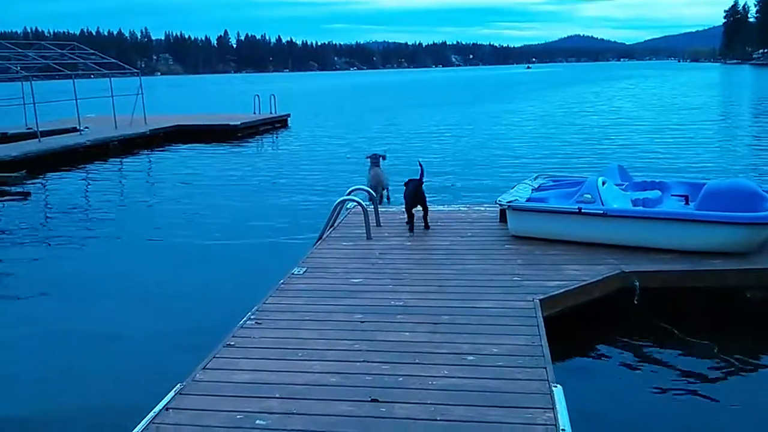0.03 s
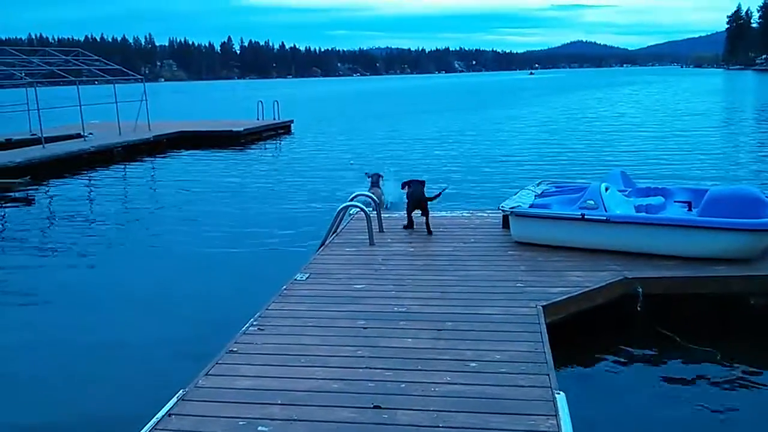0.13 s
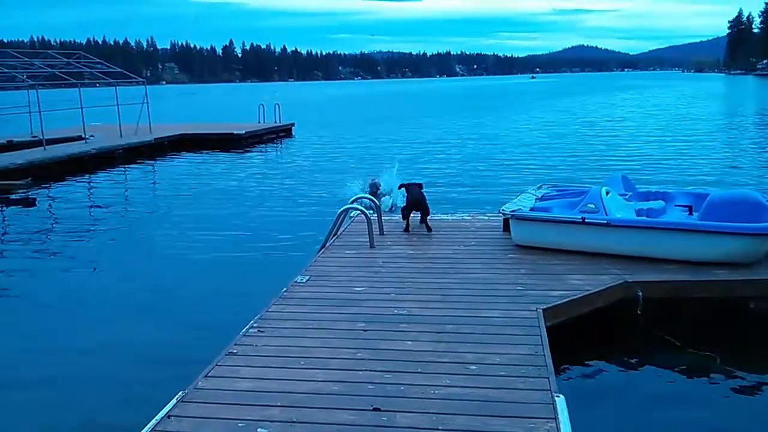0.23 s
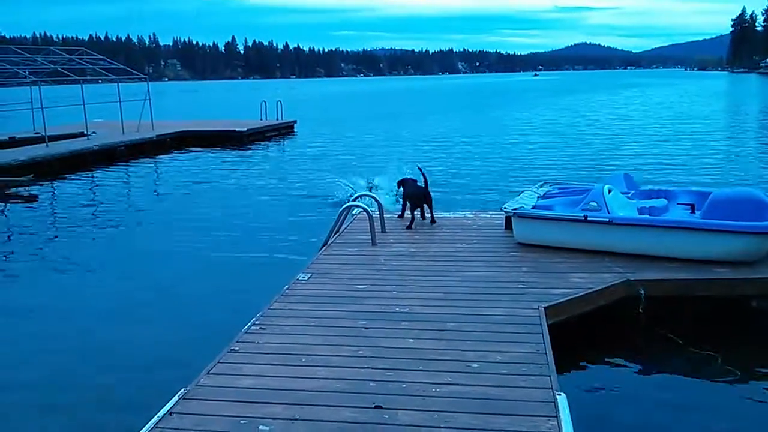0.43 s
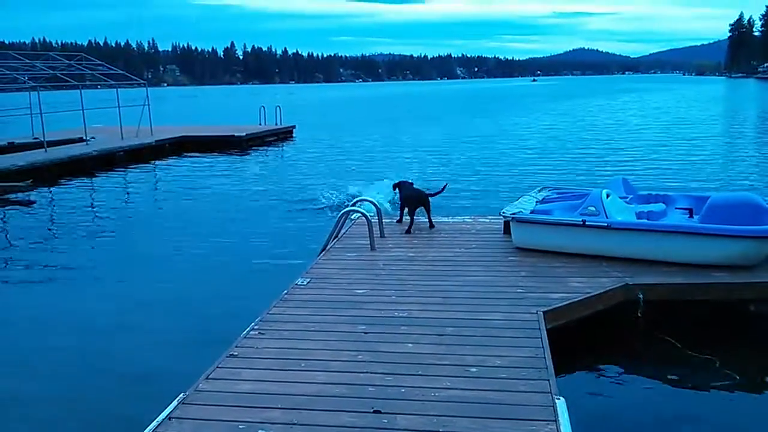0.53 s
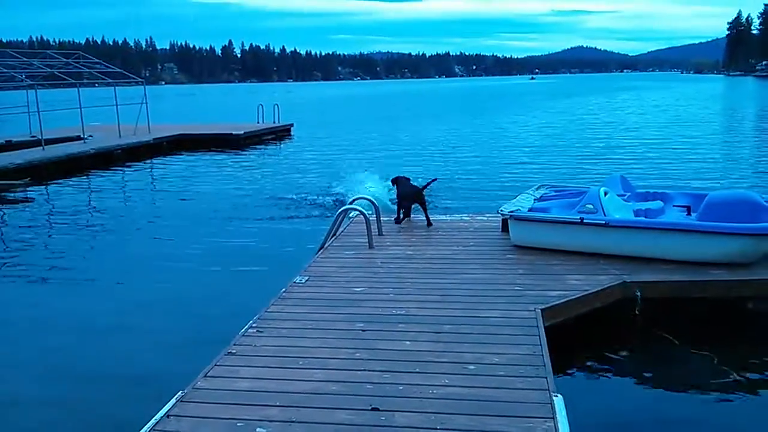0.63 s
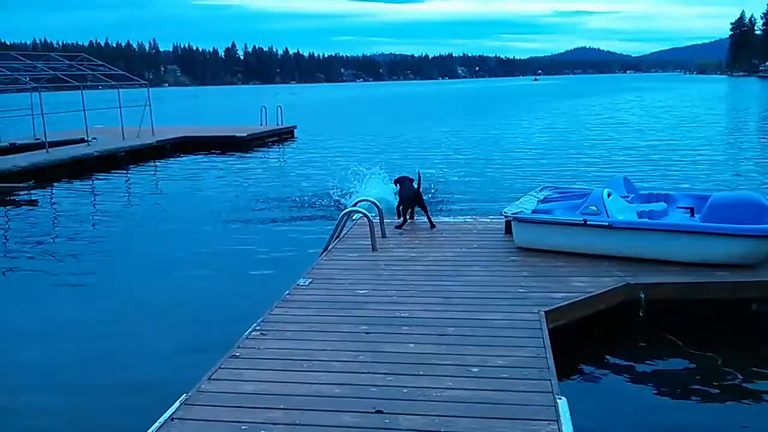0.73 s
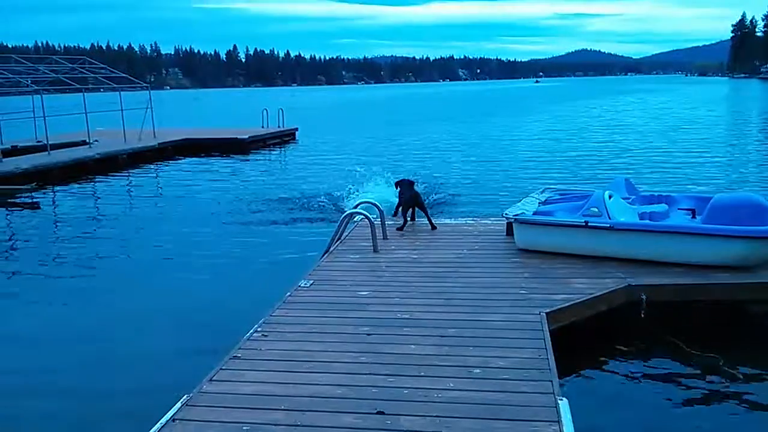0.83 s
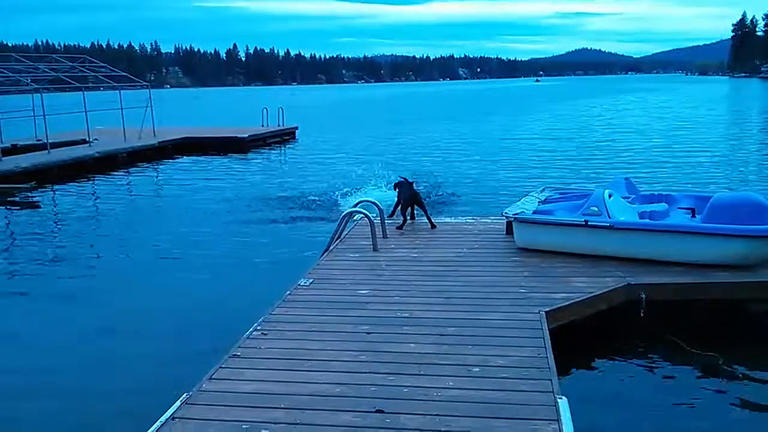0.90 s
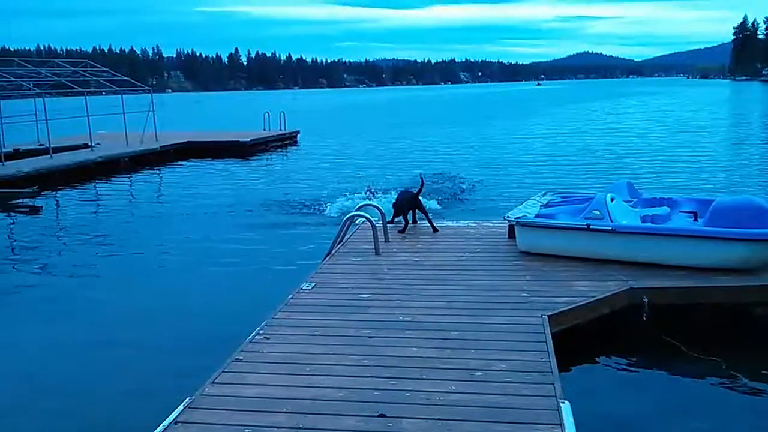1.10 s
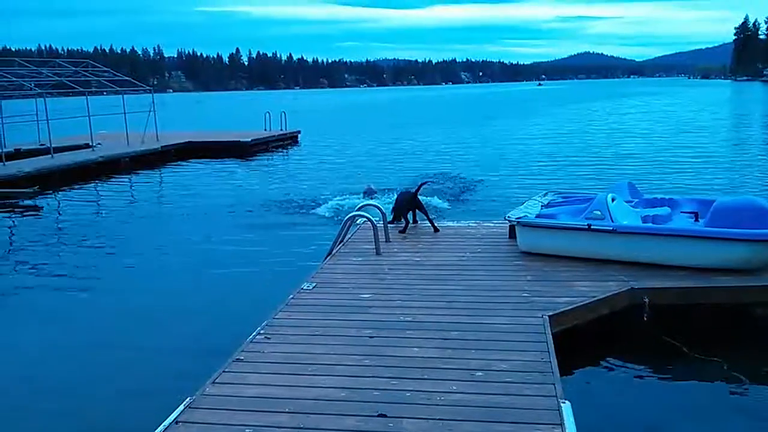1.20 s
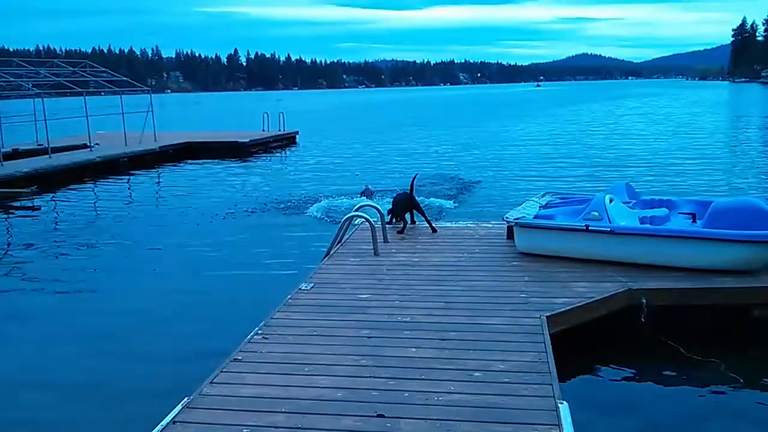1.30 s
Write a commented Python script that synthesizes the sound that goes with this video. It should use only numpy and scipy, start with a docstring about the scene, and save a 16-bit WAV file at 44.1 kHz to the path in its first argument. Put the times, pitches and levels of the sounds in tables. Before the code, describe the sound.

A dog splashes into a lake at about 0.2 seconds with a slap and a deep, hollow plunk. A smaller splash follows at 0.6 seconds, then muffled churning, plops and pattering drops ease off toward 1.3 seconds. A second dog's paws thump unevenly on a wooden dock, loudest at about 0.9 seconds. Faint low wind and hiss lie underneath.

```python
"""At a wooden dock on a lake, a dog leaps in while a second dog steps about on the boards.
Its body slaps the water and traps pockets of air that boom. The water plops and churns,
and spray patters back down. Slaps and churning sound muffled and hollow because they ring
a small camera housing. Low wind and a faint hiss lie underneath."""
import sys
import numpy as np
from scipy import signal
from scipy.fft import rfft, irfft
from scipy.io import wavfile
from scipy.ndimage import uniform_filter1d

SR = 44100
rng = np.random.default_rng(int(sys.argv[2]) if len(sys.argv) > 2 else 0)


def bounce(signal):
    """Save signal as a 16-bit WAV file at the path given by the first command-line argument."""
    frames = np.transpose(np.atleast_2d(signal))
    limited = np.clip(frames, -1, 1)
    pcm = np.round(limited * 32767).astype(np.int16)
    wavfile.write(sys.argv[1], SR, pcm)


N = 59535  # 1.35 s

# air trapped under the dog: t/s, level/dB, f/Hz, ring time/s, pitch rise/(share of f per s)
AIR_POCKETS = [(0.2328, -15, 173.5, 0.079, 0.35), (0.267, -22.5, 178, 0.076, 0.5),
               (0.2986, -22, 189, 0.056, 0.5), (0.331, -28.5, 180, 0.06, 0.3),
               (0.379, -30.5, 172, 0.059, 0.3), (0.497, -37, 176, 0.11, 0.25),
               (0.6035, -28, 224, 0.034, 0.2), (0.613, -27, 159.4, 0.094, 0.23),
               (0.699, -42.5, 125, 0.11, 3.2), (0.7177, -36, 160.2, 0.18, 2.9),
               (0.981, -37.5, 278.4, 0.087, 0.57), (1.009, -42, 284, 0.078, 1.5)]
# sharp smacks on the water: t/s, level/dB
BODY_SMACKS = [(0.1797, -48), (0.225, -22.5), (0.2347, -30)]
# the tones in each smack: f/Hz, level/dB, ring time/s
SMACK_TONES = [(1485, -12, 0.017), (1740, -7.5, 0.0052), (2194, -21.5, 0.004)]
def plunge():
    """The body smacks the surface, and the air it traps booms with a rising pitch."""
    booms = sum(undb(db) * ring(start, hz, ring_s, rise_s=0.0031, glide=glide)
                for start, db, hz, ring_s, glide in AIR_POCKETS)
    smacks = sum(undb(db + tone_db) * ring(start, hz, ring_s, rise_s=0.00097)
                 for start, db in BODY_SMACKS for hz, tone_db, ring_s in SMACK_TONES)
    return booms + smacks


# heavy slaps of water: t/s, level/dB, fade time/s
WATER_SLAPS = [(0.178, -43.5, 0.01), (0.231, -43, 0.033), (0.6055, -36.5, 0.0084), (0.787, -50, 0.007)]
def slaps():
    """Each slap of water is a burst of noise that rings the housing."""
    hollow_noise = steady(housing(rng.standard_normal(N)), span_s=0.0071)
    return bursts(WATER_SLAPS) * hollow_noise


# gulps of water: t/s, level/dB, f/Hz, ring time/s, rise time/s
GULPS = [(0.051, -52.5, 594, 0.044, 0.0026), (0.117, -53.5, 904, 0.031, 0.0044),
         (0.1795, -40.5, 640, 0.024, 0.0048), (0.208, -39, 606, 0.017, 0.0042),
         (0.236, -31, 508, 0.033, 0.0023), (0.4195, -39.5, 656, 0.09, 0.0015),
         (0.438, -40, 616, 0.036, 0.0064), (0.7225, -38.5, 636, 0.096, 0.006),
         (0.792, -39, 665.5, 0.094, 0.0056), (0.9587, -36, 673, 0.069, 0.0024),
         (1.038, -42, 681, 0.19, 0.0059), (1.225, -48, 680, 0.078, 0.0048)]
# the tones in each gulp: multiple of f, level/dB, share of the ring time
GULP_TONES = [(0.998, 2, 0.71), (1.4, -18, .9)]
def plops():
    """Single gulps of water each give a short, hollow ring."""
    return sum(undb(db + tone_db) * ring(start, hz * multiple, ring_s * share, rise_s)
               for start, db, hz, ring_s, rise_s in GULPS for multiple, tone_db, share in GULP_TONES)


# loudness of the low wash around the dog: t/s, level/dB
WASH_LOUDNESS = [(0, -50), (.16, -61.5), (.22, -64.5), (.25, -40.5), (.36, -38), (.47, -43.5), (.55, -46),
                 (.615, -39.5), (.68, -48), (.85, -55.5), (1.0, -50), (1.14, -63), (1.35, -61)]
# its tone, from bass to treble: f/Hz, level/dB
WASH_TONE = [(40, -20), (90, -11.5), (170, 2), (240, -2.5), (315, 1), (380, -18), (700, -19.5),
             (2000, -62.5)]
# loudness of the churning: t/s, level/dB
CHURN_LOUDNESS = [(0, -58.5), (.05, -71), (.115, -58), (.165, -74), (.22, -45), (.25, -47.5), (.31, -43.5),
                  (.39, -54.5), (.48, -52), (.55, -52), (.62, -40.5), (.70, -53.5), (.81, -48.5),
                  (.89, -58), (1.02, -47), (1.15, -57), (1.35, -58.5)]
def stirred_water():
    """Many tiny splashes blur into a low wash and a churning that rings the housing."""
    wash = steady(colour(patter(scatter_db=1.5), WASH_TONE), span_s=0.025)
    churn = steady(housing(patter(scatter_db=1.5)), span_s=0.02)
    return swell(WASH_LOUDNESS) * wash + swell(CHURN_LOUDNESS) * churn


# steps on the dock: t/s, thump level/dB, knock level/dB
PAW_STEPS = [(0.196, -41.5, -58), (0.246, -57, -52), (0.417, -38, -41.5), (0.612, -39, -32.5),
             (0.649, -43, -50), (0.8941, -25, -25.5), (1.18, -46, -60), (1.246, -40, -53)]
# deep tones of the whole dock: f/Hz, level/dB, ring time/s, rise time/s
DOCK_TONES = [(69, -2.5, 0.1, 0.012), (124, -10, 0.037, 0.012)]
# tones of one plank: f/Hz, level/dB, ring time/s, rise time/s
PLANK_TONES = [(158, 3.5, 0.018, 0.0038), (280, -9.5, 0.017, 0.0032)]
def paws():
    """A paw knocks on one plank, and the whole dock answers with a slower thump."""
    thumps = sum(undb(db + tone_db) * ring(start, hz, ring_s, rise_s)
                 for start, db, _ in PAW_STEPS for hz, tone_db, ring_s, rise_s in DOCK_TONES)
    knocks = sum(undb(db + tone_db) * ring(start, hz, ring_s, rise_s)
                 for start, _, db in PAW_STEPS for hz, tone_db, ring_s, rise_s in PLANK_TONES)
    return thumps + knocks


# loudness of the shower of small drops: t/s, level/dB
SHOWER_LOUDNESS = [(0, -71.5), (.06, -78.5), (.11, -78), (.17, -85), (.185, -64.5), (.27, -53.5),
                   (.36, -64), (.46, -65), (.59, -62), (.62, -52), (.70, -59), (.795, -53.5), (.88, -59.5),
                   (1.02, -57.5), (1.35, -59)]
# its tone: f/Hz, level/dB
SHOWER_TONE = [(500, -30.5), (950, 12), (1150, -10), (1400, 4.5), (1620, -6.5), (1850, 3.5), (2100, -2),
               (2330, -14.5), (2500, -10), (3000, -18.5), (6000, -36.5)]
# single big drops: t/s, level/dB, f/Hz, ring time/s
BIG_DROPS = [(0.103, -62.5, 1680, 0.04), (0.559, -51.5, 1810, 0.038), (0.640, -50, 1820, 0.028),
             (0.664, -52.5, 1920, 0.023), (0.689, -58, 4300, 0.03), (0.769, -64, 4450, 0.017),
             (0.795, -60.5, 4400, 0.025)]
def drops():
    """Small drops patter on the lake; each big one traps a bubble that plinks upward in pitch."""
    shower = steady(colour(patter(scatter_db=2), SHOWER_TONE), span_s=0.072)
    plinks = sum(undb(db) * ring(start, hz, ring_s, rise_s=0.0016, glide=0.79)
                 for start, db, hz, ring_s in BIG_DROPS)
    return swell(SHOWER_LOUDNESS) * shower + plinks


# loudness of the fine spray: t/s, level/dB
SPRAY_LOUDNESS = [(0, -95), (.11, -80), (.174, -89), (.183, -68), (.205, -75), (.28, -64.5), (.35, -79),
                  (.45, -81), (.58, -75), (.62, -70), (.67, -76), (.73, -70), (.80, -69.5), (.88, -75.5),
                  (1.35, -74.5)]
# clumps of spray hitting the lake: t/s, level/dB, fade time/s
SPRAY_CLUMPS = [(0.1795, -64, 0.006), (0.688, -63.5, 0.013), (0.719, -62, 0.006), (0.755, -72, .008)]
# tone of the spray and its clumps: f/Hz, level/dB
SPRAY_TONE = [(1200, -30.5), (2500, 0.5), (3100, -4.5), (3900, 3.5), (4700, -2), (5500, -5), (6400, -35),
              (15000, -48)]
# loudness of the thin fizz on top of the splash: t/s, level/dB
FIZZ_LOUDNESS = [(0, -99), (.176, -87), (.183, -68.5), (.205, -76), (.25, -69), (.31, -70), (.40, -83),
                 (.88, -77), (.96, -73), (1.15, -81), (1.35, -79.5)]
# its tone: f/Hz, level/dB
FIZZ_TONE = [(3000, 0), (6500, -7), (8000, -0.5), (15000, -2)]
def spray():
    """Spray lands as a fine patter, a few bright splats and a thin fizz."""
    droplets = steady(colour(patter(scatter_db=2.5), SPRAY_TONE), span_s=0.086)
    splats = bursts(SPRAY_CLUMPS) * noise(SPRAY_TONE)
    fizz = swell(FIZZ_LOUDNESS) * noise(FIZZ_TONE)
    return swell(SPRAY_LOUDNESS) * droplets + splats + fizz


# pitches at which the housing rings: f/Hz, width of one filter/Hz, level/dB
HOUSING_TONES = [(308, 64, -3.5), (494.6, 55, -1.5), (646, 104.4, 7), (904.2, 92, 2.5), (1345, 41, -18.5),
                 (1710, 240, -18)]
def housing(x):
    """The hollow housing rings at a few pitches and muffles everything between them."""
    out = 0
    for hz, width, db in HOUSING_TONES:
        b, a = signal.iirpeak(hz, hz / width, fs=SR)
        once = signal.lfilter(b, a, x)
        out = out + undb(db) * signal.lfilter(b, a, once)  # filtering twice sharpens the peak
    return unit(out)


# tones of the wind and the hiss: f/Hz, level/dB
WIND_TONE = [(15, -3.5), (35, -25), (75, 4.5), (130, -3), (300, -22.5), (1000, -44), (4000, -70.5)]
HISS_TONE = [(500, -25), (2500, -13.5), (5000, 1.5), (6400, -3.5), (8000, 2), (15000, 2.5)]
def wind_and_hiss():
    """Wind rumbles low under a faint, steady hiss."""
    return undb(-58.5) * noise(WIND_TONE) + undb(-76) * noise(HISS_TONE)


def ring(start, hz, ring_s, rise_s, glide=0):
    """A tone that swells for rise_s, then fades by 60 dB in ring_s; glide bends it upward."""
    t = since(start)
    onset = np.sin(np.pi / 2 * np.minimum(t / rise_s, 1)) ** 2
    fade = np.exp(-np.log(1000) * np.maximum(t - rise_s, 0) / ring_s)
    return onset * fade * np.sin(2 * np.pi * hz * t * (1 + glide * t / 2))


def bursts(rows, rise_s=0.0011):
    """The loudness of short splashes: each jumps up, then dies away."""
    return sum(undb(db) * (1 - np.exp(-since(start) / rise_s)) * np.exp(-since(start) / fade_s)
               for start, db, fade_s in rows)


def patter(scatter_db, hits_per_s=2500):
    """Tiny clicks at random moments; more scatter makes their sizes less even."""
    hits = rng.random(N) < hits_per_s / SR
    direction = np.sign(rng.standard_normal(N))
    return hits * direction * undb(scatter_db * rng.exponential(size=N))


def noise(tone):
    """A smooth rush of noise with the given tone."""
    return colour(rng.standard_normal(N), tone)


def colour(x, tone):
    """Shape a sound's bass and treble along (f/Hz, level/dB) points."""
    hz, db = np.array(tone).T
    f = np.maximum(np.fft.rfftfreq(N, 1 / SR), 1)
    gain = undb(np.interp(np.log(f), np.log(hz), db))
    # build the filter so that each click rings after it lands, not before
    cepstrum = irfft(np.log(gain), N)
    response = np.exp(2 * rfft(cepstrum[:N // 2], N))
    return unit(irfft(rfft(x) * response, N))


def steady(x, span_s):
    """Even out swells slower than span_s, keeping the fine crackle."""
    power = uniform_filter1d(x ** 2, max(int(span_s * SR), 2))
    return x / np.sqrt(power + 1e-9)


def swell(curve):
    """Loudness that follows (t/s, level/dB) points."""
    return undb(np.interp(np.arange(N) / SR, *np.array(curve).T))


def since(start):
    """Seconds since a moment, zero before it."""
    return np.maximum(np.arange(N) / SR - start, 0)


def undb(db):
    """Turn decibels into a number to multiply by."""
    return 10 ** (np.asarray(db) / 20)


def unit(x):
    """Scale a sound to an average power of 1."""
    return x / np.sqrt(np.mean(x ** 2))


def scene():
    """The splash, the paws and the background together in one channel."""
    splash = plunge() + slaps() + plops() + stirred_water() + drops() + spray()
    return (splash + paws() + wind_and_hiss())[None]


def record(dry, top_hz=15750):
    """Cut away the very highest treble."""
    return signal.sosfilt(signal.ellip(10, .2, 70, top_hz, fs=SR, output="sos"), dry)


dry = scene()
out = record(dry)
bounce(out)
```